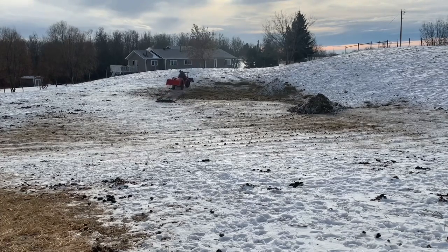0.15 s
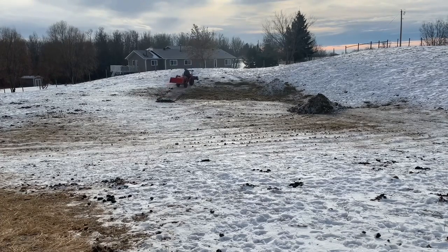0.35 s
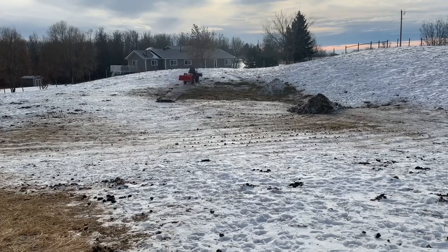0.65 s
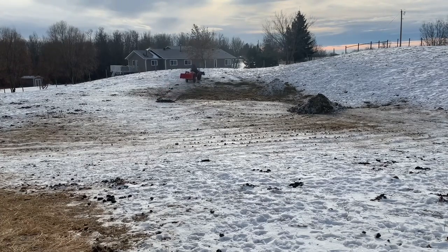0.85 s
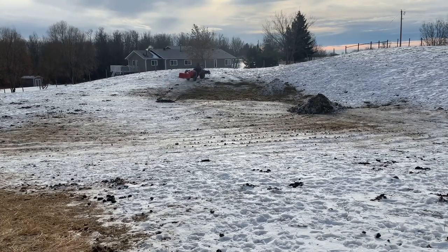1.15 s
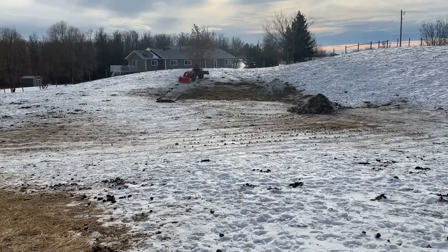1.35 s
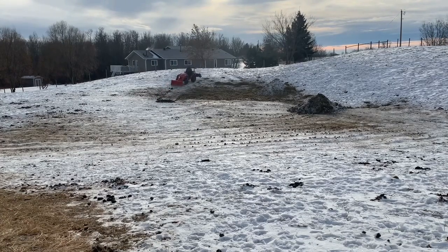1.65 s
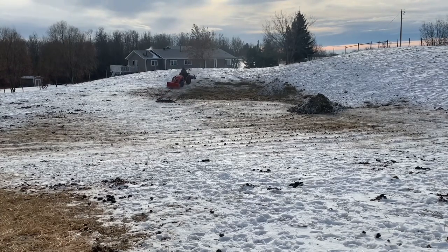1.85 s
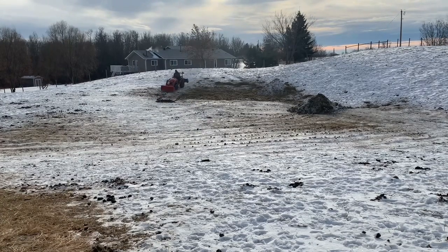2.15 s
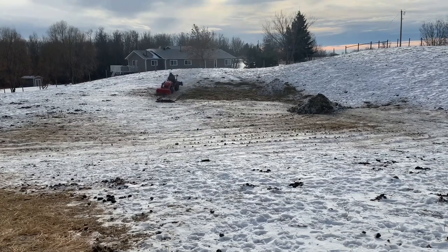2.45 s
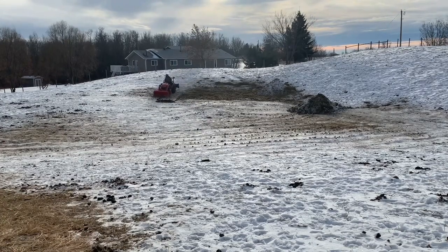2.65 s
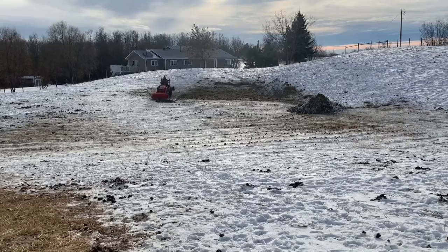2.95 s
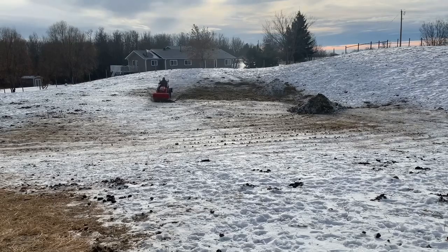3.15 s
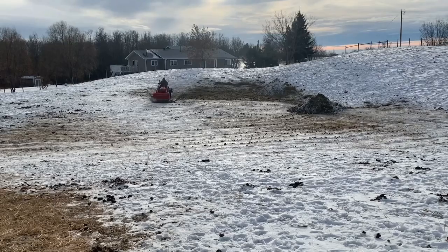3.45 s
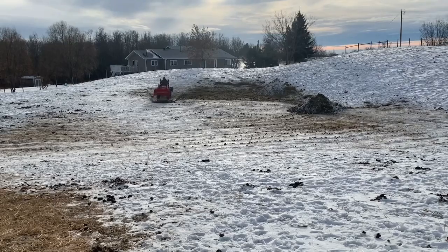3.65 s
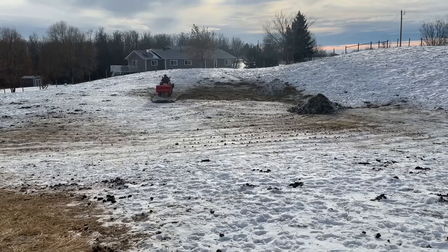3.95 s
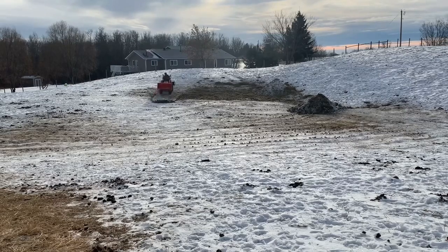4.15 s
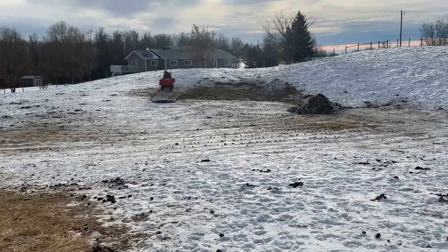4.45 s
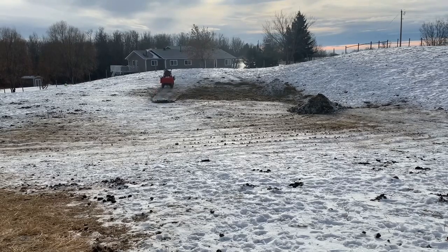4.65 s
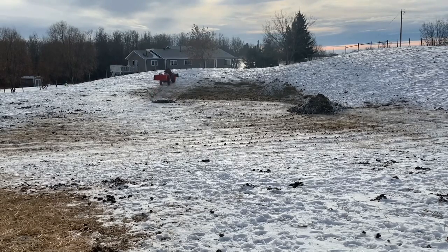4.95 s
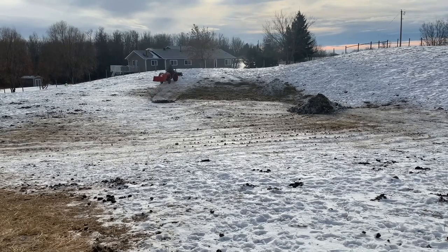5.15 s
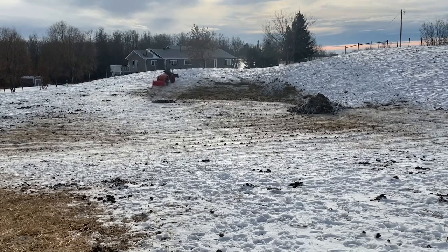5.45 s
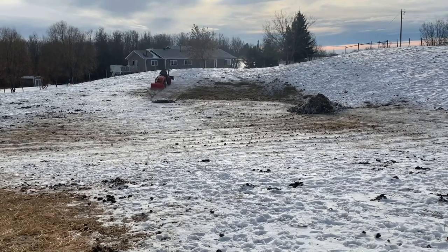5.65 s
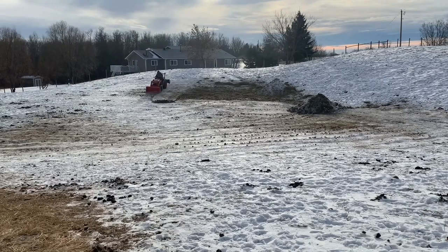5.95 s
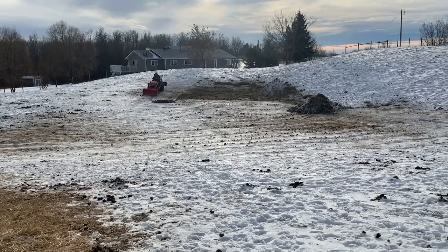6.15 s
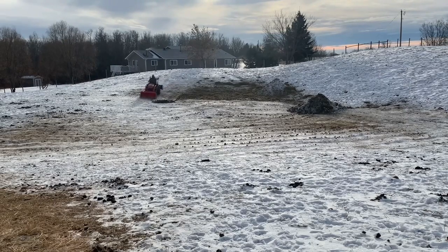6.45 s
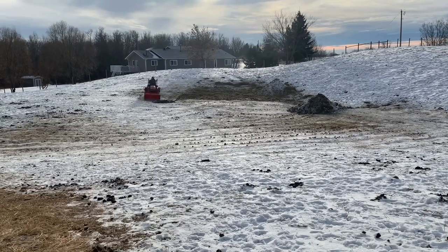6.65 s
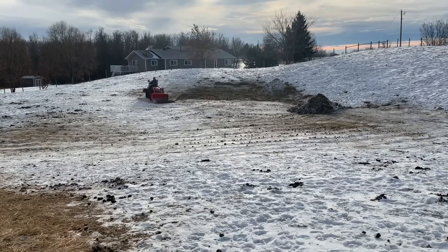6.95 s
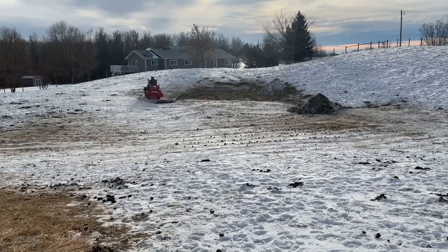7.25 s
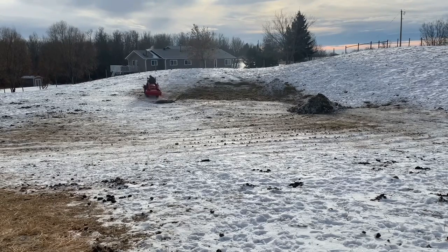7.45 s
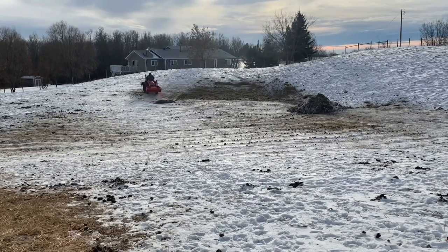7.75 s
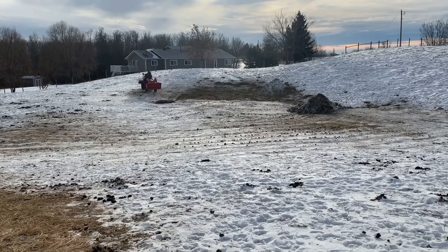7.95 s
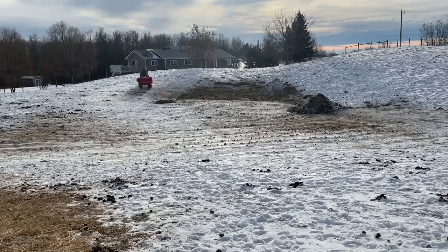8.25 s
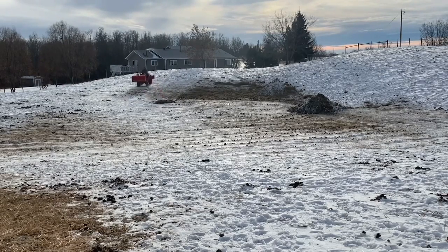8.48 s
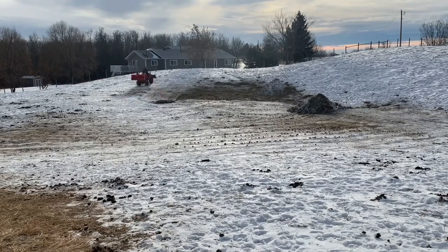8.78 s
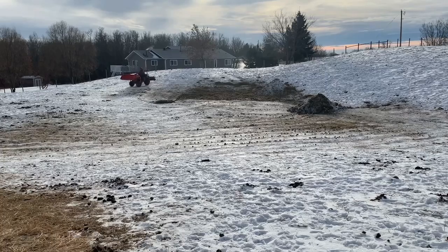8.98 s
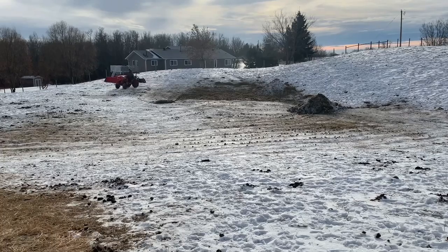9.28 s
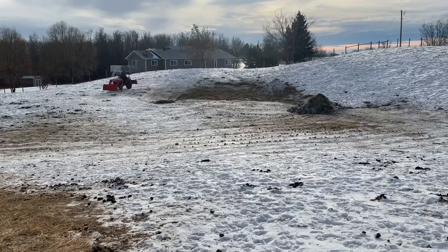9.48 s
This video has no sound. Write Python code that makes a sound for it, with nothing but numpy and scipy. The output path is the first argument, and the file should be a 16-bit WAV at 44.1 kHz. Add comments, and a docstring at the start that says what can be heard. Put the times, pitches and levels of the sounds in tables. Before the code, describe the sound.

A small diesel tractor hums steadily across an open snowy field, roaring and hissing in rough lurches under load while wind rumbles and pops.

```python
"""A high hum, wandering by about a semitone, comes from a small diesel tractor working its front loader
far across a snowy field; under load it roars and hisses in lurches, and wind rumbles and pops.
The hum is a harmonic series on the firing rate; roar, clatter and hiss are filtered noise and struck
resonances. Clatter and hiss carry a short ground echo. Faint whistling bands and short metal squeaks
come and go, and the wind acts directly on the two microphone ports."""
import sys
import numpy as np
from scipy import signal
from scipy.io import wavfile
from scipy.ndimage import uniform_filter1d

SR = 44100
rng = np.random.default_rng(int(sys.argv[2]) if len(sys.argv) > 2 else 0)


def wav_record(signal):
    """Record a signal, one row per channel, as 16-bit PCM in the file named by sys.argv[1]."""
    frames = np.transpose(np.atleast_2d(signal))
    bounded = np.clip(frames, -1, 1)
    # unit amplitude maps onto the largest positive 16-bit level
    quanta = np.round(bounded * 32767).astype(np.int16)
    wavfile.write(sys.argv[1], SR, quanta)


N = 424223
TIME = np.arange(N) / SR
HOP = 512  # samples between spectral frames
HZ = np.fft.rfftfreq(4 * HOP, 1 / SR)[:, None]
FRAMES = np.arange(N // HOP + 5) * HOP / SR  # seconds


# Exhaust fundamental. Each row: time in seconds, firing rate in Hz, level in dB before waver and port trim.
FIRING_NOTE = [(0, 252.6, -42.5), (.38, 253.5, -31), (.75, 256.5, -28), (.88, 260, -29),
               (1.05, 263.7, -28.5), (1.4, 266.3, -26.5), (2.2, 264.7, -28), (2.8, 266.2, -27.5),
               (3.0, 256.9, -27), (3.2, 250, -31.5), (3.55, 257, -28), (3.9, 253.1, -30),
               (4.55, 256.1, -31), (5.2, 262.1, -30.5), (6.4, 266.2, -29), (6.75, 250, -33),
               (7.02, 253, -41), (7.15, 252.3, -30), (7.9, 255.4, -30), (8.4, 264.3, -31.5),
               (8.55, 259.1, -28.5), (8.95, 259, -28), (9.05, 266.3, -28.5), (9.62, 262.2, -28)]
# Exhaust harmonics. Each row: time in seconds, then levels of multiples 2, 3 and 4 in dB,
# before waver and port trim.
OVERTONE_LEVELS = [(0, -49, -54, -48), (.3, -73, -56, -48), (.42, -41, -47.5, -43), (1.05, -42, -45.5, -55),
                   (2.0, -31.5, -62, -49), (2.8, -31, -47, -68), (2.9, -47, -47, -52),
                   (3.03, -47, -52, -45), (3.13, -34, -44.5, -44.5), (4.0, -38, -41, -50),
                   (4.25, -60, -40.5, -55), (4.55, -48, -43, -58), (5.2, -32, -57, -70),
                   (7.0, -46, -55, -71), (7.2, -40, -45.5, -69), (7.7, -35, -41.5, -72),
                   (8.6, -38, -41, -71), (9.235, -39.5, -34.5, -57), (9.26, -38, -45.5, -49),
                   (9.62, -39, -40, -49)]


def exhaust():
    """Harmonic series: periodic firing sounds whole multiples of its rate, jittered by uneven firings."""
    hz, *levels_db = curves(FIRING_NOTE, TIME) + curves(OVERTONE_LEVELS, TIME)
    jittered_hz = hz * (1 + 0.00301 * wobble(0.039))
    turns = np.cumsum(jittered_hz) / SR
    note = np.zeros(N)
    for k, (db, waver_db) in enumerate(zip(levels_db, (0.79, 2.9, 3.1, 2.0))):
        amplitude = np.sqrt(2) * gain_of(db + waver_db * wobble(0.011))
        note += amplitude * np.cos(2 * np.pi * ((k + 1) * turns + rng.random()))
    return np.array([gain_of(-1.5) * note, np.roll(note, -2)])  # right leads by two samples


def engine_noise():
    """Superposition: roar, clatter and hiss are separate noises that share the surges of the load."""
    roar_gain, clatter_gain, hiss_gain = effort()
    surge, echo = wobble(0.016), ground()
    return (roar(roar_gain, surge) + clatter(clatter_gain, surge, echo)
            + hiss(hiss_gain, surge, echo))


CHATTER_SHARE = 0.57  # amplitude share of knocks in the roar


def roar(gain, surge):
    """Resonant filtering: steady noise and combustion knocks both excite the bodywork."""
    flicker = gain_of(1.0 * surge + 1.54 * wobble(0.0046))
    steady = np.sqrt(1 - CHATTER_SHARE ** 2) * port_noise(peaks(BODY_MODES))
    return gain * slack() * flicker * (steady + CHATTER_SHARE * chatter())


# Clatter resonances. Each row: centre in Hz, width in Hz, relative level in dB.
CLATTER_MODES = [(1130, 21, 14.5), (1090, 500, 9.5)]


def clatter(gain, surge, echo):
    """Resonant filtering: noise through a narrow and a broad resonance, joined by its ground echo."""
    return gain * gain_of(2.0 * surge) * port_noise(peaks(CLATTER_MODES), echo)


# Spectral shape of the hiss. Each row: frequency in Hz, relative density in dB per Hz.
HISS_SHAPE = [(1000, -49), (1500, -5), (2200, -4), (3800, -4), (5800, -9.5), (8900, -8), (14000, -9),
              (15600, -11)]
# Treble tilt of the hiss above 7 kHz. Each row: time in seconds, slope in dB per octave.
TREBLE_SLOPE = [(0, 1), (1.07, -6.5), (1.3, -3.5), (2.7, 0), (2.85, -5.5), (4.65, -0.5), (5.07, -6.5),
                (5.2, -0.5), (6.6, -5), (8.0, -4), (9.62, -11.5)]
# Sharp puffs of hiss. Each row: start in seconds, gain added to the hiss in dB, decay time in seconds.
HISS_PUFFS = [(4.835, -38, 0.014)]


def hiss(gain, surge, echo):
    """Amplitude modulation: broadband noise pulses at the firing rate while its colour flickers."""
    slope_db = curves(TREBLE_SLOPE, FRAMES)[0]
    patches = rng.standard_normal((len(FRAMES), len(HZ))).T
    streaks = evened(uniform_filter1d(uniform_filter1d(patches, 3, 0), 30, 1))  # narrow and long
    clouds = evened(uniform_filter1d(uniform_filter1d(patches, 40, 0), 5, 1))  # wide and short
    tilt_db = slope_db * np.log2(np.maximum(HZ / 7000, 1))
    colour_db = read(HISS_SHAPE, HZ) + tilt_db + 2.4 * streaks + 1.2 * clouds
    firing = np.cos(2 * np.pi * np.cumsum(curves(FIRING_NOTE, TIME)[0]) / SR)
    flicker_db = .5 * surge + .7 * wobble(.06) + .6 * wobble(.004) + .7 * firing
    level = gain * gain_of(flicker_db)
    for s, db, decay in HISS_PUFFS:
        level = level + gain_of(db) * (TIME > s) * np.exp(-abs(TIME - s) / decay)
    return level * port_noise(gain_of(colour_db), echo)


# Engine noise between loads. Each row: time in seconds, then nominal roar, clatter and hiss in dB.
IDLE_LEVELS = [(0, -59, -44, -42), (.6, -45, -51, -41), (1.07, -47, -49, -39), (2.85, -54, -48, -44),
               (3.25, -40.5, -43, -43), (3.9, -38, -46, -42), (4.7, -48.5, -54, -43), (6.71, -64, -49, -44),
               (6.82, -40.5, -44.5, -42.5), (8.0, -41.5, -51.5, -43.5), (8.95, -37.5, -53, -41.5),
               (9.62, -41, -42, -43.5)]
# Spells under load. Each row: start in seconds, end in seconds, then nominal roar, clatter and hiss in dB,
# before build-up and sag.
LOAD_SPELLS = [(1.098, 2.84, -24.5, -44.5, -33), (4.819, 5.01, -21, -50, -53),
               (5.087, 6.55, -21.5, -44, -33), (9.348, 9.792, -20.5, -44, -33.5)]
ROAR_SAG_DB, HISS_SAG_DB = -6, -8.5  # change by the end of a spell
ROAR_SAG_POWER = 3.9  # above 1 the roar holds on longer


def effort():
    """Power addition: idle and loaded noise are unrelated, so the squares of their gains add."""
    t = TIME[::32]
    roar_power, clatter_power, hiss_power = gain_of(curves(IDLE_LEVELS, t)) ** 2
    for start, end, roar_db, clatter_db, hiss_db in LOAD_SPELLS:
        gate, way = spell(start, end, t)
        roar_now_db = roar_db + ROAR_SAG_DB * way ** ROAR_SAG_POWER
        roar_power = roar_power + (gate * gain_of(roar_now_db)) ** 2
        clatter_power = clatter_power + (gate * gain_of(clatter_db)) ** 2
        hiss_power = hiss_power + (gate * gain_of(hiss_db + HISS_SAG_DB * way)) ** 2
    return [np.interp(TIME, t, np.sqrt(power)) for power in (roar_power, clatter_power, hiss_power)]


SNAP_S, FIRST_DB, BUILD_S, LET_GO_S = 0.0028, -4, 0.15, 0.17  # the load bites, builds up, and lets go


def spell(start, end, t):
    """Transient envelope: gain of one loaded spell, and the fraction of it that has passed."""
    build_db = FIRST_DB * np.exp(-abs(t - start) / BUILD_S)
    bite = np.clip((t - start) / SNAP_S, 0, 1) * gain_of(build_db)
    release = np.clip((end - t) / LET_GO_S + .5, 0, 1)
    return bite * release ** 2, np.clip((t - start) / (end - start), 0, 1)


KNOCKS_PER_S, KNOCK_SPREAD_DB = 170, 2


def chatter(count=6):
    """Random impulse train: uneven combustion knocks strike the bodywork at several tunings."""
    strength_db = KNOCK_SPREAD_DB * np.minimum(rng.exponential(1, N), 4)
    knocks = gain_of(strength_db) * (rng.random(N) < KNOCKS_PER_S / SR)
    kind = rng.integers(0, count, N)
    shifts = np.linspace(.95, 1.13, count)
    return evened(sum(signal.oaconvolve(knocks * (kind == k), ring(shift))[:N]
                      for k, shift in enumerate(shifts)))


# Lurches of the roar under load. Each row: start in seconds, peak level in dB.
ROAR_LURCHES = [(1.105, -17.5), (1.195, -15.5), (1.256, -13), (1.416, -17.5), (1.644, -15), (1.901, -14),
                (2.099, -15), (2.126, -13), (2.189, -12.5), (2.225, -15), (2.369, -13.5), (2.493, -15),
                (2.625, -15.5), (4.84, -16), (5.081, -15), (5.314, -9.5), (5.402, -14.5), (5.479, -13),
                (5.552, -12), (5.616, -14), (5.676, -13), (5.71, -12.5), (5.749, -10), (5.773, -7.5),
                (5.824, -10.5), (6.15, -13), (6.242, -12), (6.309, -15), (6.379, -13.5), (9.358, -13),
                (9.414, -12), (9.47, -12)]


def lurches():
    """Impulse response: each lurch sets all bodywork modes ringing, a little off pitch each time."""
    out = np.zeros(N + 4096)
    for (s, db), shift in zip(ROAR_LURCHES, rng.uniform(0.95, 1.04, len(ROAR_LURCHES))):
        out[round(s * SR):][:4096] += gain_of(db) * ring(shift)
    return out[:N]


SLACK_DB, SLACK_S = -12, 0.012  # deepest dip, and its time constant either side


def slack():
    """Gain modulation: the roar slackens around every lurch."""
    marks = np.zeros(N)
    marks[(np.array(ROAR_LURCHES)[:, 0] * SR).astype(int)] = 1
    t = np.arange(-2048, 2049) / SR
    nearness = signal.oaconvolve(marks, np.exp(-abs(t) / SLACK_S), "same")
    return gain_of(SLACK_DB * np.minimum(nearness, 1))


# Bodywork resonances. Each row: centre in Hz, width in Hz, relative level in dB.
BODY_MODES = [(350, 120, -12.5), (415, 47, -5.5), (504.7, 24, 3), (569.3, 21, -4), (621, 155, -8),
              (840, 100, -16)]


def ring(shift):
    """Modal decay: the bodywork is struck once and each resonance dies at a rate set by its width."""
    t = TIME[:4096]
    modes = sum(gain_of(db) * np.sqrt(width) * np.sin(2 * np.pi * hz * shift * t)
                * np.exp(-np.pi * width * t) for hz, width, db in BODY_MODES)
    struck = modes * (1 - np.exp(-t / 0.0014)) ** 2  # soft onset
    return struck / abs(struck).max()


# Metal squeaks. Each row: start in seconds, nominal level in dB before partials, roughness and side trim.
SQUEAKS = [(8.75, -39), (8.818, -35), (8.975, -36), (9.055, -39.5), (9.305, -38)]
# Squeak partials. Each row: starting frequency in Hz, greatest relative level in dB.
SQUEAK_MODES = [(2150, -4), (3300, -8.5)]
SQUEAK_S, SQUEAK_RISE = .032, 0.295  # length, and share by which the pitch climbs


def ticks():
    """Frequency modulation: metal scrapes briefly, a rough squeak that climbs in pitch."""
    t, out = TIME[:round(SQUEAK_S * SR)], np.zeros(N)
    bent_time = t * (1 + SQUEAK_RISE * t / (2 * SQUEAK_S))
    for (s, db), chance in zip(SQUEAKS, rng.random((len(SQUEAKS), len(SQUEAK_MODES)))):
        squeak = sum(gain_of(mode_db - 5.3 * c) * np.sin(2 * np.pi * hz * bent_time)
                     for (hz, mode_db), c in zip(SQUEAK_MODES, chance))
        out[round(s * SR):][:len(t)] += gain_of(db) * squeak * np.sin(np.pi * t / SQUEAK_S)
    roughness = gain_of(4.7 * wobble(0.0016))
    return out * roughness * gain_of([[2], [-2]])  # louder on the left


# Narrow bands of hiss. Each row: start in seconds, end in seconds, starting centre in Hz, final centre in Hz,
# width in Hz, level in dB relative to the other bands.
WHISTLE_BANDS = [(0.96, 1.653, 3790, 3930, 60, 6), (3.848, 4.901, 8900, 9000, 600, -4.5),
                 (6.449, 7.7, 4740, 4700, 120, -12), (8.649, 9.201, 2530, 2990, 600, -6)]


def whistle():
    """Narrow-band noise: each band fades in, drifts in pitch and fades out."""
    bands = 0
    for start, end, from_hz, to_hz, width, db in WHISTLE_BANDS:
        way = np.clip((FRAMES - start) / (end - start), 0, 1)
        centre = from_hz + (to_hz - from_hz) * way
        bands = bands + gain_of(db) * np.sin(np.pi * way) / (1 + (2 * (HZ - centre) / width) ** 2)
    return gain_of(-55.5 + 4.3 * wobble(0.041)) * port_noise(bands)


def wind():
    """Flow noise: pressure fluctuations at the ports give a rumble and separate pops."""
    return rumble() + wind_pops()


# Wind on the ports. Each row: time in seconds, rumble level in dB before its lumps.
WIND_LEVEL = [(0, -30.5), (.3, -33), (.62, -47.5), (.88, -32), (1.6, -28), (3.199, -36), (4.2, -43.5),
              (4.33, -32.5), (4.5, -39), (4.58, -27.5), (4.88, -35.5), (4.96, -21), (5.09, -35),
              (5.85, -23), (5.95, -38), (6.16, -28.5), (7.1, -30.5), (8.63, -33), (9.05, -53),
              (9.54, -31.5)]
# Spectral shape of the rumble. Each row: frequency in Hz, relative density in dB per Hz.
RUMBLE_SHAPE = [(25, -20), (55, -46), (110, -20), (190, 2.5), (300, 6), (420, -4.5), (700, -7.5),
                (1200, -25.5), (2500, -56)]


def rumble():
    """Turbulence spectrum: low-frequency noise swells and sinks in lumps."""
    level_db = curves(WIND_LEVEL, TIME)[0] + 2.6 * wobble(0.041)
    return gain_of(level_db) * port_noise(gain_of(read(RUMBLE_SHAPE, HZ)))


# Wind pops. Each row: start in seconds, nominal kick level in dB before the side trim,
# low thump in dB relative to the pop.
WIND_POPS = [(0.043, -26.5, 5.5), (0.292, -31, -3), (0.314, -27, 1), (0.342, -29, 2), (1.038, -26, 0),
             (1.119, -25, 6), (1.435, -20, 2), (1.474, -19, 5.5), (1.6, -19.5, 6.5), (1.612, -20.5, 6),
             (1.865, -23, 5), (4.556, -24.5, 3), (4.567, -27, 5), (4.601, -23.5, 8.5), (4.674, -35, -5),
             (4.707, -21.5, 3), (4.92, -23, 5), (4.9314, -18.5, -12), (4.937, -13.5, -3),
             (4.9433, -13, 2.5), (4.948, -16.5, -4), (4.973, -23, -5), (4.991, -26, 3), (5.005, -19, -10),
             (5.408, -22, 4), (5.785, -21.5, 5), (5.814, -19.5, 9), (6.126, -19.5, 8.5), (6.332, -18.5, -5),
             (6.351, -21, -6), (6.368, -19.5, 4.5), (6.4, -20, -3), (6.446, -26, 6), (6.538, -23, -1),
             (6.577, -18.5, -0.5), (6.797, -22, -0.5), (6.83, -26, 5), (6.888, -25, -1), (6.618, -31, 0),
             (6.969, -30, -9), (7.128, -28, 8), (7.423, -26.5, 2), (7.874, -26, 6)]
SHARPER = 0.23  # dB of kick width lost per dB above -32 dB
SCUFF_DB, SCUFF_S, SCUFF_HZ = -9, 0.0073, (280, 1250)  # rough tail of a pop: level, decay, band


def wind_pops():
    """Pressure transients: clustered short kicks with a rough tail over a low damped thump."""
    t, out, pops = TIME[:2048], np.zeros((2, N + 2048)), WIND_POPS + small_pops()
    band = signal.butter(2, SCUFF_HZ, "band", fs=SR, output="sos")
    order = np.arange(5)
    for (s, db, thump_db), chance in zip(pops, rng.random((len(pops), 4, 5))):
        late, wide, sign, side = chance
        centre = .0006 + 0.008 * late * np.sign(order)  # the first kick is never late
        width = 0.00024 + 0.000086 * wide * np.sign(order)
        u = (t[:, None] - centre) / width * gain_of(SHARPER * max(db + 32, 0))
        size = np.where(sign < .5, -1, 1) * 0.7 ** order  # later kicks are weaker
        kicks = (size * u * np.exp(.5 - u ** 2 / 2)).sum(1)
        thump_envelope = t / 0.0012 * np.exp(1 - t / 0.0015)
        thump = thump_envelope * np.sin(2 * np.pi * (300 + 250 * late[0]) * t)
        rough = evened(signal.sosfilt(band, rng.standard_normal(2048)))
        scuff = gain_of(SCUFF_DB) * rough * np.exp(-t / SCUFF_S)
        sides = gain_of(5.1 * (side[0] - .5) * np.array([[1], [-1]]))
        pop = kicks + scuff + gain_of(thump_db) * thump
        out[:, round(s * SR):][:, :2048] += gain_of(db) * sides * pop
    return out[:, :N]


def small_pops(count=22):
    """Random point process: scattered thumping pops whose level follows the wind of the moment."""
    s = rng.random(count) * TIME[-1]
    return [(a, db - 16.5, 17.5) for a, db in zip(s, curves(WIND_LEVEL, s)[0])]


# Ground reflection. Each row: frequency in Hz, echo strength at the left port as an amplitude ratio
# before the final fade.
ECHO_STRENGTH = [(700, .02), (1500, .7), (3400, .62), (5200, .15)]
# Comb of the ground echo. Each row: time in seconds, spacing in Hz.
COMB_SPACING = [(1.0, 938.3), (2.4, 1088), (4.4, 1073), (6.2, 1167), (8.7, 1263)]
LEAVE_S, ECHO_FADE_S = 8.52, 0.36  # start of the echo's fade, and its time constant


def ground(right_share=.5):
    """Comb interference: sound meets its copy off the snow; the comb widens overall as the tractor recedes."""
    delay = 1 / curves(COMB_SPACING, FRAMES)[0]
    fade = np.maximum(FRAMES - LEAVE_S, 0) / ECHO_FADE_S
    bounce = read(ECHO_STRENGTH, HZ) * np.exp(-2j * np.pi * HZ * delay - fade)
    return np.array([1 + bounce, 1 + right_share * bounce])


# Likeness of the ports. Each row: frequency in Hz, left-right correlation from 0 to 1.
PORT_LIKENESS = [(60, 0.88), (300, 0.85), (700, 0.96), (1400, 0.75), (3000, 0.54), (7000, 0.15),
                 (15000, 0.77)]
# Phase between the ports. Each row: frequency in Hz, lead of the left in radians.
PORT_LEAD = [(60, 0), (860, .2), (2070, 1.2), (2500, .3), (3010, .9), (3530, .1), (4480, .9), (5860, 3.4),
             (6370, 3), (6980, .4), (10100, .4), (11800, 1.5), (15200, 3)]
# Level between the ports. Each row: frequency in Hz, left minus right in dB.
PORT_LEAN = [(60, -0.5), (380, 0.5), (1290, -0.5), (2380, 3.5), (4400, 4), (8120, 0.5), (15000, -1)]


def port_noise(magnitude, echo=1):
    """Partial coherence: noise of rms 1 from a bins x frames magnitude, partly shared by the ports."""
    a, b, c, d = rng.standard_normal((len(FRAMES), len(HZ), 4)).T
    same = np.clip(read(PORT_LIKENESS, HZ), -1, 1)
    left = a + 1j * b
    mixed = same * left + np.sqrt(1 - same ** 2) * (c + 1j * d)
    right = mixed * np.exp(-1j * read(PORT_LEAD, HZ))
    lean = gain_of(read(PORT_LEAN, HZ) / 2)
    spectra = np.array([left * lean, right / lean]) * magnitude * echo
    return evened(signal.istft(spectra, nperseg=4 * HOP, noverlap=3 * HOP)[1][:, :N])


def peaks(modes):
    """Resonance: magnitude of a set of steep peaks whose powers add."""
    return np.sqrt(sum(gain_of(2 * db) / (1 + (2 * (HZ - hz) / width) ** 2) ** 2
                       for hz, width, db in modes))


def wobble(seconds):
    """Smoothed randomness: a curve of rms 1 that changes over about this time."""
    size = max(round(seconds * SR), 2)
    return evened(uniform_filter1d(uniform_filter1d(rng.standard_normal(N), size), size))


def gain_of(db):
    """Logarithmic level: decibels to amplitude."""
    return 10 ** (np.asarray(db) / 20)


def evened(x):
    """Normalisation: scales to rms 1."""
    return x / np.sqrt(np.mean(abs(x) ** 2) + 1e-20)


def read(points, hz):
    """Logarithmic frequency: a spectrum table interpolated at the frequencies hz."""
    f, value = np.transpose(points)
    return np.interp(np.log(hz + 1), np.log(f + 1), value)


def curves(rows, t):
    """Linear interpolation: the columns of a curve table at the times t."""
    s, *columns = np.transpose(rows)
    return [np.interp(t, s, c) for c in columns]


def scene():
    """Superposition: all sources add at the two ports."""
    return exhaust() + engine_noise() + lurches() + ticks() + whistle() + wind()


def record(dry):
    """Band limiting: the microphone drops the bass and a steep low-pass ends the treble."""
    thin = signal.sosfilt(signal.butter(2, 100, "high", fs=SR, output="sos"), dry)
    low_pass = signal.firwin(511, 15700, window=("kaiser", 9), fs=SR)
    return signal.oaconvolve(thin, low_pass[None], "same")


dry = scene()
out = record(dry)
wav_record(out)
```